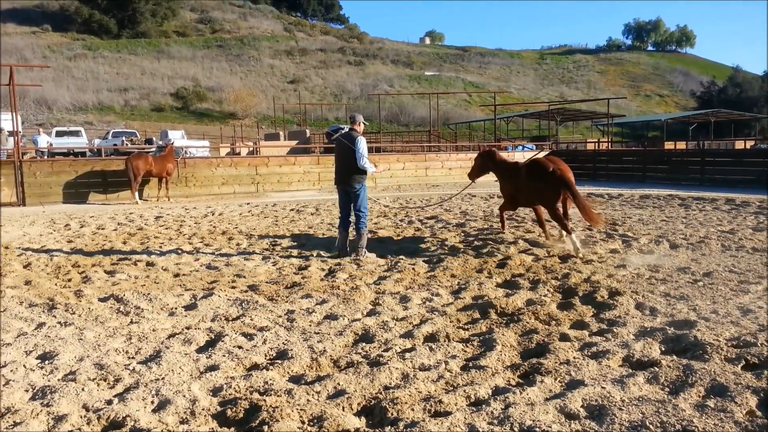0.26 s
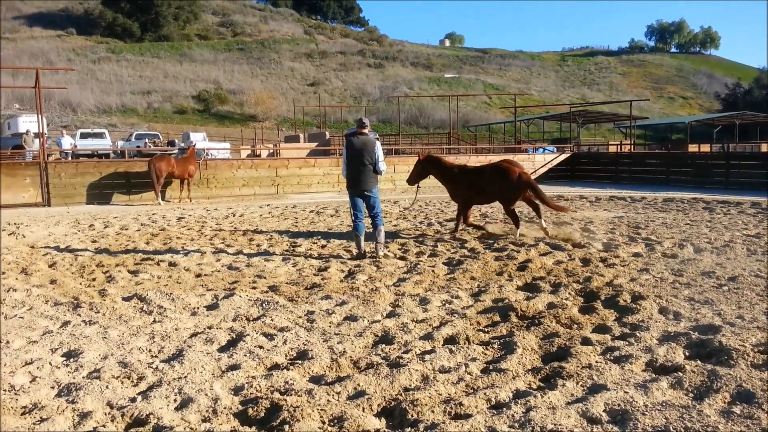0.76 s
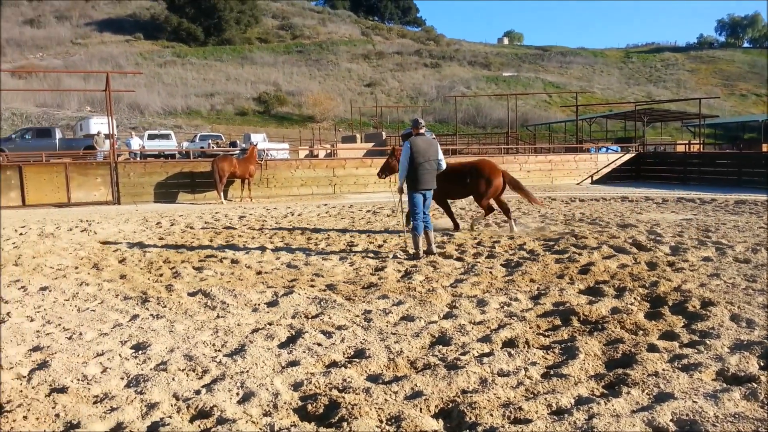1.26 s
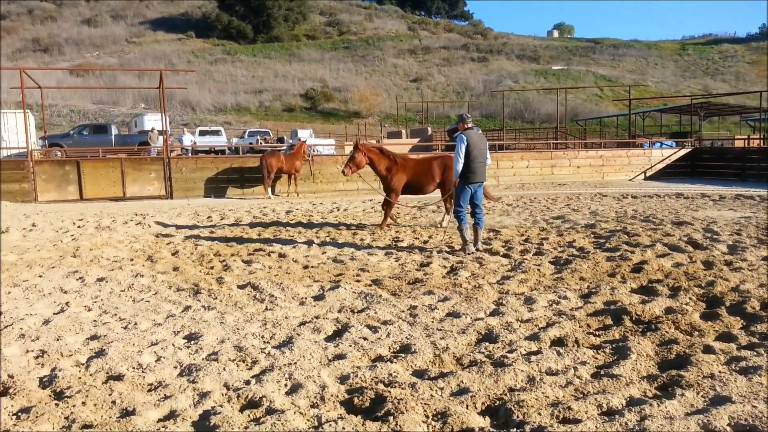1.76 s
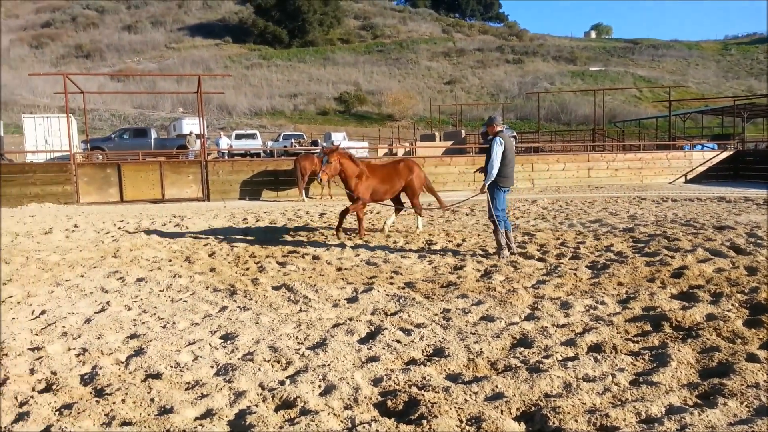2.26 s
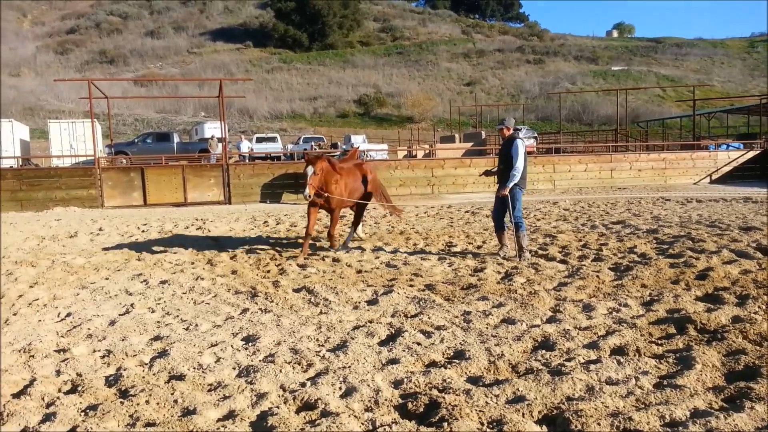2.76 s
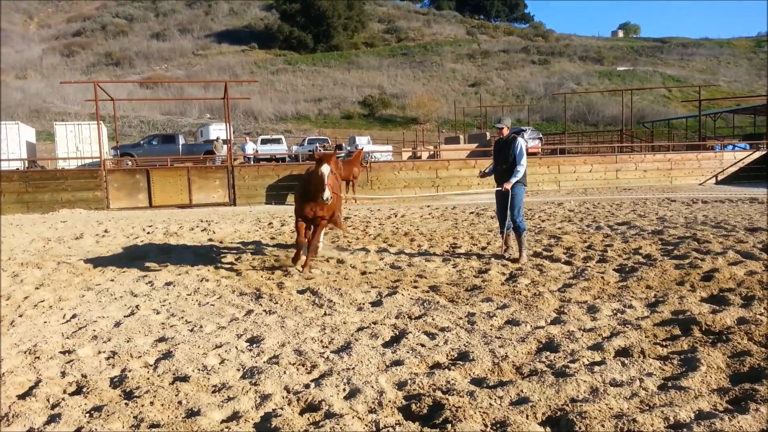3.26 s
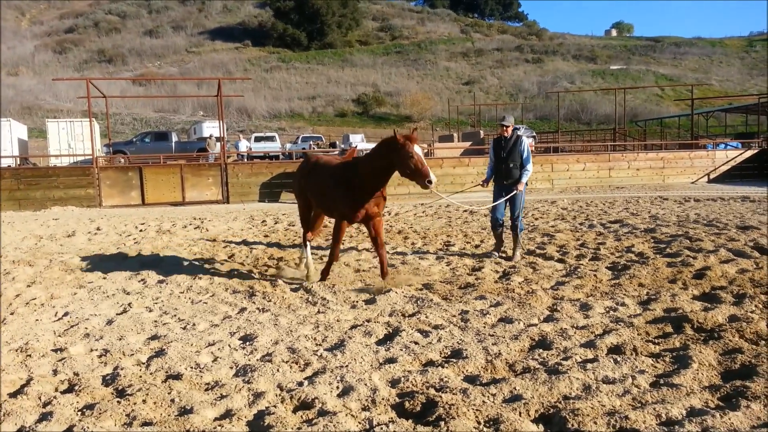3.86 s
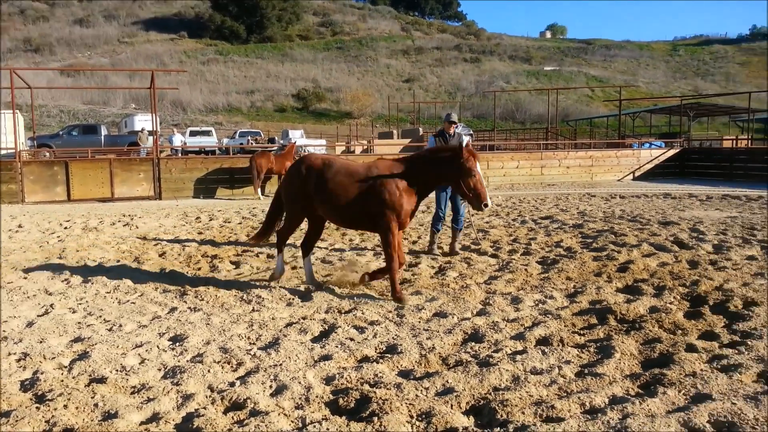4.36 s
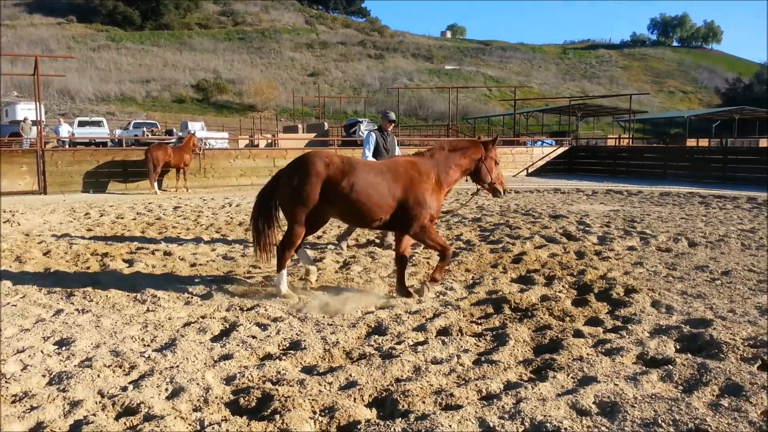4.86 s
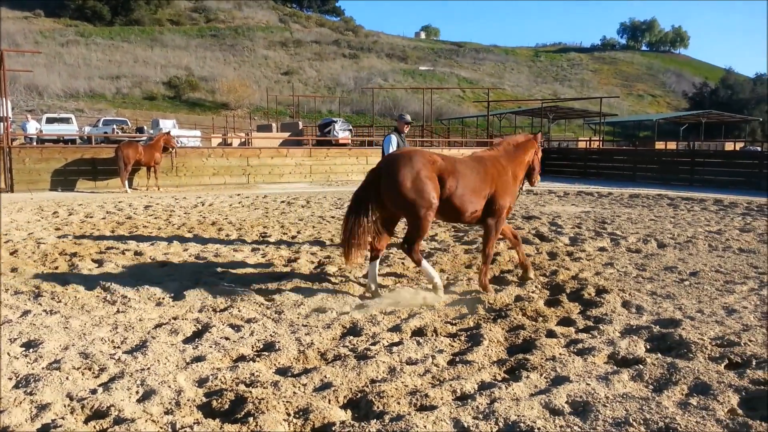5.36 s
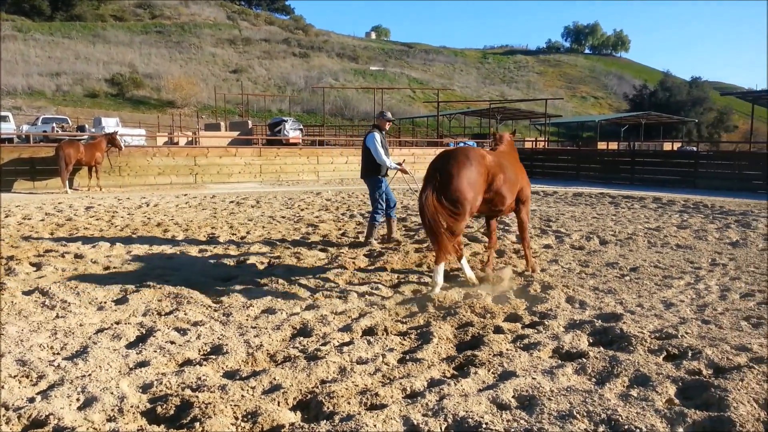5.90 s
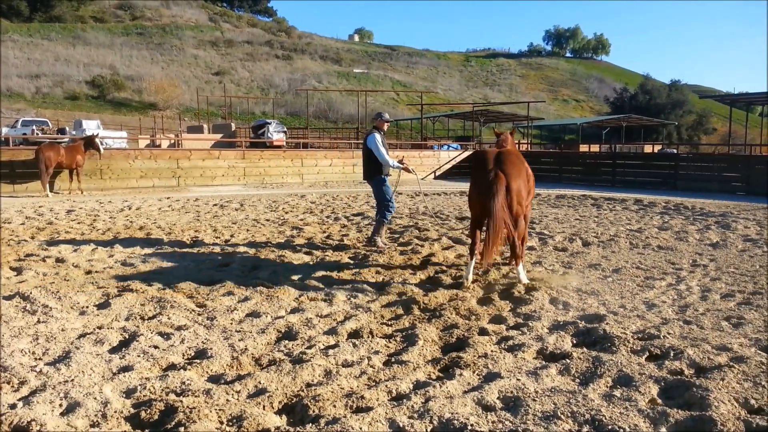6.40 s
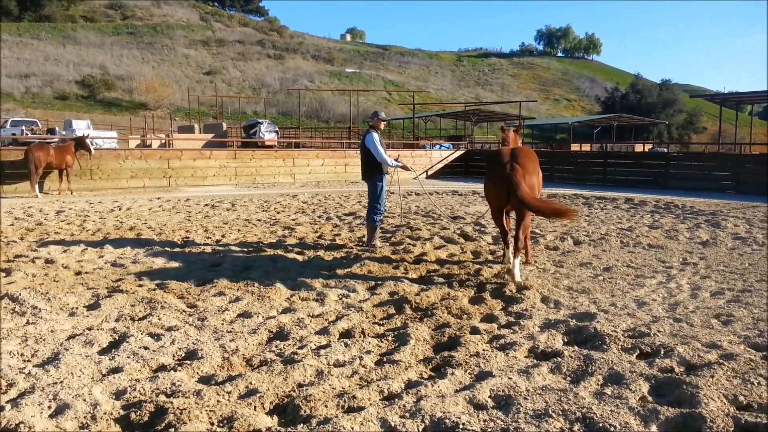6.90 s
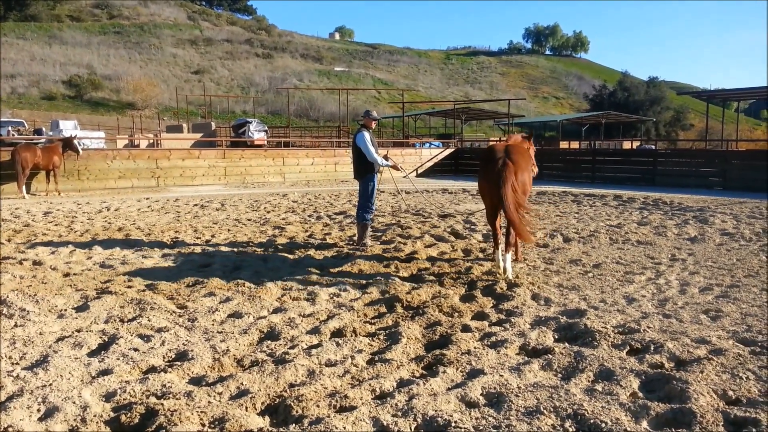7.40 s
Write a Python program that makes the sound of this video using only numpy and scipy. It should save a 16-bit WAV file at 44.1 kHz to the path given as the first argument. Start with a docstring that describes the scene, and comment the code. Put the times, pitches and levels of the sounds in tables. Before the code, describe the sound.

Low gusts rumble and pop, mostly on the right, over a horse's regular breathy snorts, sandy footfalls and light clinking of a lead-line snap.

```python
"""A horse is in mid-blow as a gritty swish and a metal clink sound, on a breezy day in a sandy arena.
It circles on a lead line at a steady canter or trot, blowing filtered noise in time with its stride.
Grainy noise and low thuds make gritty swishes, some of them hoof falls and some nostril hiss;
dying modes clink for the snap of the line. Gusts of shaped noise rumble and pressure bumps pop on the
microphone, mostly on the right port; a bird trills falling notes far off, over a faint high whine."""
import sys
import numpy as np
from scipy import signal
from scipy.fft import rfft, irfft
from scipy.io import wavfile
from scipy.ndimage import uniform_filter1d

SR = 44100
rng = np.random.default_rng(int(sys.argv[2]) if len(sys.argv) > 2 else 0)


def inscribe(sig):
    """Save sig as 16-bit PCM at rate SR to the path in sys.argv[1].

    A 1-D sig is mono; a 2-D sig holds one channel per row.
    Samples are clipped to [-1, 1] before scaling.
    """
    pcm = np.round(np.clip(np.atleast_2d(sig).T, -1, 1) * 32767)
    wavfile.write(sys.argv[1], SR, pcm.astype(np.int16))


N = 336924
TIME = np.arange(N) / SR
BINS = np.fft.rfftfreq(N, 1 / SR)


def amp(db):
    """Decibels to gain."""
    return 10 ** (np.asarray(db) / 20)


def unit(x):
    """Scales to rms 1."""
    return x / np.sqrt(np.mean(x ** 2) + 1e-20)


def curve(rows):
    """Joins (time, value) points into a control curve at every sample."""
    return np.interp(TIME, *np.transpose(rows))


def colour(x, spectrum):
    """Filters by (frequency, level) points joined on a log-frequency axis."""
    hz, db = np.transpose(spectrum)
    response = amp(np.interp(np.log(BINS + 1), np.log(hz), db))
    return irfft(rfft(x) * response, N)


def noise(spectrum):
    """Coloured noise of rms 1."""
    return unit(colour(rng.standard_normal(N), spectrum))


def wander(rate_hz):
    """Smooth random drift of rms 1, from noise with its fast changes removed."""
    lowpass = np.exp(-(BINS / rate_hz) ** 2)
    return unit(irfft(rfft(rng.standard_normal(N)) * lowpass, N))


def pair(make, shared):
    """Two channels that have a share of their power in common."""
    shared = np.clip(shared, 0, 1)
    common = np.sqrt(shared) * make()
    return common + np.sqrt(1 - shared) * np.array([make(), make()])


def add(mix, s, sound):
    """Mixes a sound in at time s, cutting whatever falls outside the scene."""
    start = round(s * SR)
    sound = sound[max(-start, 0):]
    part = mix[max(start, 0):][:len(sound)]
    part += sound[:len(part)]


def burst(t, rise, decay):
    """An envelope that swells and dies away, peak 1."""
    shape = (1 - np.exp(-(t / rise) ** 2)) * np.exp(-t / decay)
    return shape / shape.max()


# spectrum of the open air: (frequency [Hz], level [dB per Hz])
AIR_SPECTRUM = [(120, 12), (300, -5), (600, -6.5), (1100, -15.5), (2000, -22.5), (3500, -24.5),
                (15000, -23.5)]


def open_air(db=-50.5):
    """Steady coloured noise, a quarter of its power common to both ports."""
    return amp(db) * pair(lambda: noise(AIR_SPECTRUM), 0.25)


def whine(db=-77, hz=10380, blur_hz=110):
    """A faint, unsteady high tone that comes and goes."""
    return amp(db) * wander(1.0) * wander(blur_hz) * np.sin(2 * np.pi * hz * TIME)


# start of each phrase of the far bird: time [s]
BIRD_PHRASES = [.06, .44, .95, 1.25, 2.42, 5.11, 5.43, 5.77, 6.06, 6.35, 6.68, 7.27]


def bird(db=-71.5, hz=4850, length=0.114, notes_per_s=70, sweep_hz=340, rise_hz=130, blur_hz=170):
    """A thin trill of quick falling notes that swells towards its end, blurred by distance."""
    t, out = np.arange(round(length * SR)) / SR, np.zeros(N)
    progress = t / length
    for s in BIRD_PHRASES:
        note = (notes_per_s * t + rng.random()) % 1  # position within the note, 0 to 1
        pitch = hz + rise_hz * progress - sweep_hz * (note - .5)
        swell = np.sqrt(np.sin(np.pi * progress ** 2)) * np.sin(np.pi * note)
        trill = swell * np.sin(2 * np.pi * np.cumsum(pitch) / SR)
        add(out, s, amp(db) * unit(trill))
    return out * wander(blur_hz)


# spectrum of the sand: (frequency [Hz], level [dB per Hz])
SAND_SPECTRUM = [(150, -1), (500, 9.5), (2000, 3), (3200, -2.5), (5500, 4), (8000, -0.5), (11000, 1),
                 (15000, -8)]


def grains(per_s=5000, spread_db=6.5, dust=1.0):
    """Sand grains of many sizes tick over a fine hiss; rms 1."""
    hits = rng.random(N) < per_s / SR
    sizes = amp(spread_db * np.minimum(rng.exponential(1, N), 5)) * hits
    ticks = unit(sizes * rng.choice([-1, 1], N))
    return unit(colour(ticks + dust * rng.standard_normal(N), SAND_SPECTRUM))


def eddy(hz, vent_hz=72, build=0.58, collapse=1.53, sharpness=1.182):
    """A pressure bump that builds, then collapses; the microphone's bass cut makes it swing. Peak 1."""
    t = np.arange(-SR // 50, SR // 50) / SR + 0.0012  # the bump comes just ahead of the middle
    turn = 2 * np.pi * hz * sharpness * t
    bump = np.exp(-np.logaddexp(-build * turn, collapse * turn))
    bass_cut = signal.butter(N=3, Wn=vent_hz, btype="high", fs=SR, output="sos")
    swing = signal.sosfilt(bass_cut, bump)
    return swing / abs(swing).max()


def swirls(force, per_s=110, spread_db=2, slow_hz=115, fast_hz=340, roll=1):
    """Small eddies cross at random and roll on for a few turns; stronger wind brings more, faster ones."""
    out = np.zeros(N)
    for speed in np.linspace(0, 1, num=10):
        hz = slow_hz + speed * (fast_hz - slow_hz)
        favoured = np.exp(-((speed - .7 * force) / .4) ** 2)  # wind force selects the eddy speed
        rate = per_s * (.35 + force) * favoured / 2
        sizes = amp(spread_db * rng.exponential(1, N)) * (rng.random(N) < rate / SR)
        pop = eddy(hz)
        rolling = signal.lfilter(*signal.iirpeak(hz, 2, fs=SR), pop)
        out += signal.oaconvolve(sizes, pop + roll * rolling, "same")
    return out


# gusts on the microphone: (start [s], length [s], level before shaping [dB], port that is hit)
GUST_HITS = [(0.058, 0.11, -23, "right"), (0.193, 0.071, -16.5, "right"), (0.555, 0.16, -16, "right"),
             (0.732, 0.052, -21, "right"), (1, 0.073, -17, "right"), (1.111, 0.19, -17.5, "right"),
             (1.339, 0.067, -17.5, "right"), (1.423, 0.14, -22.5, "right"), (3.37, 0.058, -26.5, "right"),
             (3.626, 0.04, -12.5, "right"), (3.679, 0.279, -17.5, "right"), (3.97, .062, -14, "right"),
             (3.776, 0.037, -17, "left"), (4.092, 0.068, -25.5, "right"), (4.397, 0.037, -24.5, "right"),
             (4.581, 0.093, -24.5, "right"), (4.847, 0.12, -19, "right"), (4.953, 0.36, -26, "left"),
             (4.992, 0.075, -19.5, "right"), (5.225, 0.046, -13.5, "right"), (5.291, 0.29, -22, "right"),
             (5.55, 0.035, -23.5, "left"), (5.61, 0.11, -26, "right"), (5.866, 0.061, -26.5, "right"),
             (6.065, 0.13, -27, "right"), (6.173, 0.19, -22.5, "right"), (6.375, 0.35, -23.5, "right"),
             (6.928, 0.045, -19, "right"), (7.474, 0.089, -24, "right")]


def gusting(port, attack_s=0.016, release_s=0.0123, climb_db=1):
    """Strength of the gusts on one port: quick attack, slightly climbing hold, release."""
    t, strength = np.arange(SR) / SR, np.zeros(N)
    for s, length, db, side in GUST_HITS:
        if side == port:
            hold = amp(db + climb_db * (np.minimum(t / length, 1) - 1.5))
            attack = np.minimum(t / attack_s, 1)
            release = np.exp(-np.maximum(t - length, 0) / release_s)
            add(strength, s, attack * hold * release)
    return strength


def steady(x):
    """Evens the slow level to rms 1 and leaves the fast lumps."""
    power = uniform_filter1d(uniform_filter1d(x ** 2, size=2400), size=1200)
    return x / np.sqrt(power + 1e-6)


# course of the breeze on each port: (time [s], level before lulls and trim [dB])
LEFT_BREEZE = [(0, -40.5), (.55, -40), (1.1, -25), (1.9, -50.5), (2.45, -22.5), (2.65, -36), (4.3, -36.5),
               (5.45, -43.5), (6.8, -41), (7.2, -60), (7.64, -38.5)]
RIGHT_BREEZE = [(0, -33.5), (.43, -43), (.85, -34), (1.6, -29.5), (1.95, -44.5), (2.15, -36), (3.3, -39),
                (3.52, -24), (3.58, -45.5), (3.7, -30.5), (6.98, -35.5), (7.12, -44), (7.35, -42),
                (7.5, -38)]
# rumble of a light breeze and of a full gust: (frequency [Hz], level [dB per Hz])
BREEZE_SPECTRUM = [(20, -58), (32, -37), (50, 2), (90, 4), (140, 0), (220, -10), (350, -25), (600, -46.5),
                   (3000, -56)]
GUST_SPECTRUM = [(25, -55), (50, -11), (90, 4), (160, 7), (260, -1), (400, -14), (650, -33.5), (1200, -58),
                 (3000, -54.5)]


def wind(breeze, port, trim_db, swirl_db, hiss_db, calm_db, span_db,
         lumpy_db=3, bass_cut_hz=45, lull_db=3.5, lull_hz=9):
    """Turbulence on one port: a breeze rumbles and lulls; gusts reach higher, swirl and hiss faintly."""
    gusts = gusting(port)
    breeze_gain = amp(curve(breeze) + lull_db * wander(lull_hz))
    level_db = 20 * np.log10(np.hypot(breeze_gain, gusts))
    force = np.clip((level_db - calm_db) / span_db, 0, 1)  # 0 calm, 1 full gust
    lumps = amp(lumpy_db * wander(32.3))
    flow = np.sqrt(1 - force ** 2) * noise(BREEZE_SPECTRUM) + force * lumps * noise(GUST_SPECTRUM)
    flow += amp(swirl_db) * (0.25 + force) * lumps * unit(swirls(force))
    bass_cut = signal.butter(2, bass_cut_hz, "high", fs=SR, output="sos")
    rumble = amp(level_db + trim_db) * steady(signal.sosfilt(bass_cut, flow))
    return rumble + amp(hiss_db) * gusts * grains()


# the largest eddies: (time [s], relative level [dB], base pitch before sharpening [Hz], port that is hit)
LARGE_EDDIES = [(.076, -7, 127, "right"), (0.125, -0.5, 150, "right"), (.212, -5.5, 237, "right"),
                (.345, -14, 190, "right"), (0.472, -13.5, 212, "left"), (.602, -4, 146, "right"),
                (.692, -6, 169, "right"), (.777, -8.5, 204, "right"), (1.205, -3, 180, "right"),
                (1.387, -1, 234, "right"), (1.449, -3, 199, "right"), (1.513, -5.5, 178, "right"),
                (1.542, -2.5, 244, "right"), (3.509, -10.5, 141, "right"), (3.635, -2, 208, "right"),
                (3.665, -3, 202, "left"), (3.737, -4, 334, "right"), (3.853, -3.5, 240, "right"),
                (3.887, -5.5, 342, "right"), (3.92, 2, 213, "right"), (4.115, -0.5, 160, "right"),
                (4.207, -6, 152, "right"), (4.31, -2, 219, "right"), (4.667, -8, 190, "right"),
                (4.918, -5.5, 274, "right"), (5.016, -5.5, 194, "right"), (5.085, -5, 189, "right"),
                (5.254, -2, 176, "right"), (5.546, -4.5, 138, "right"), (5.84, -10, 194, "right"),
                (6.195, -1, 224, "right"), (6.242, -4, 201, "right"), (6.255, -3.5, 203, "right"),
                (6.331, -6, 171, "right"), (6.366, -3, 143, "right"), (6.556, -4.5, 195, "right"),
                (6.717, -.5, 196, "right"), (6.762, -11.5, 176, "right"), (6.95, -7.5, 228, "right"),
                (6.972, -12, 172, "right"), (7.297, -16.5, 119, "left"), (7.386, -13, 148, "right")]


def eddies(flow, port, gain_db=-2.5, sweep=0.85, sweep_s=0.0065, wake=0.21, wake_s=0.00692):
    """Large eddies sweep finer turbulence aside and pop; smaller ones of chance size run ahead and behind."""
    pressure, room = np.zeros(N), np.ones(N)
    dip = min(sweep, 1) * np.hanning(round(2 * sweep_s * SR))
    for s, db, hz, side in LARGE_EDDIES:
        if side == port:
            for place, share in [(-0.011, 1), (-1, wake), (0.96, wake)]:  # main, ahead, behind
                lag, size, speed = 1 + place * rng.uniform(-0.51, 0.512, 3)
                pop = eddy(hz * np.sqrt(speed))
                start = s + place * lag * wake_s - len(pop) / SR / 2
                add(pressure, start, amp(db + gain_db) * share * size * pop)
            add(room, s - sweep_s, -dip)
    return room * flow + pressure


# stones clicking under a hoof: (time [s], peak level [dB], pitch [Hz])
PEBBLE_CLICKS = [(0.037, -30.5, 3900), (0.7438, -45, 5230), (1.235, -39.5, 2420), (3.991, -37.5, 3600),
                 (4.336, -36, 4240)]


def pebbles(decay=0.0011, width=0.27):
    """A dry click of stone on hoof: a band of noise that is over in a few cycles."""
    t, out = np.arange(SR // 50) / SR, np.zeros(N)
    for s, db, hz in PEBBLE_CLICKS:
        band = signal.butter(2, [hz * (1 - width), hz * (1 + width)], "band", fs=SR, output="sos")
        click = signal.sosfilt(band, rng.standard_normal(len(t)) * np.exp(-t / decay))
        add(out, s, amp(db) * click / abs(click).max())
    return out


def ring(modes, t, detune):
    """Dying modes; every knock lands on another spot and weights them differently."""
    hz, db, t60 = np.transpose(modes)[:, :, None]
    size, shift, phase = rng.standard_normal((3, len(modes), 1))
    fade = amp(db + 2 * size - 60 * t / t60)
    tones = np.sin(2 * np.pi * (hz * (1 + detune * shift) * t + phase))
    return (fade * tones).sum(0)


# the snap knocks on the halter ring: (time [s], relative level [dB], high ring relative to that [dB])
SNAP_KNOCKS = [(0.0277, -33.5, -8), (0.076, -36, -2), (.2099, -36, -3.5), (0.8757, -34.5, -3),
               (1.0616, -40, -30), (1.0782, -35.5, -30), (1.213, -35.5, -30), (1.6943, -29.5, -15),
               (1.8582, -30, -4.5), (1.8793, -31.5, -13), (2.612, -28, -22), (2.7435, -33.5, -23),
               (3.2886, -35, -23), (3.97, -36, -37), (4.101, -31.5, -7), (4.1808, -34, -22),
               (4.4273, -31, -30), (4.5017, -26.5, -34), (4.8336, -38, 1.5), (5.007, -32.5, -8),
               (5.038, -34.5, -7), (5.403, -30.5, -15), (5.424, -36, -7), (5.574, -34, 6.5),
               (5.6195, -23.5, -12), (5.8321, -37, -6), (5.9266, -31.5, -26), (5.938, -33, -4),
               (5.985, -34, -4), (6.1404, -52, 11.5), (6.454, -27.5, -5), (6.577, -40, -1)]
# modes of the metal body, and of the thin high ring: (base pitch [Hz], relative level [dB], t60 [s])
BODY_MODES = [(5310, -10.5, 0.07), (5950, 4, 0.015), (6440, -6.5, 0.076), (10060, -6.5, 0.042),
              (11040, -2.5, 0.016)]
HIGH_RING_MODES = [(12400, -4.5, 0.098), (12530, -4, 0.13)]


def snap(knock_db=-8, tick_db=-11.5, tick_decay=0.0047, pitch_spread=0.0155,
         ring_left_db=-7, ring_right_db=0):
    """Metal on metal: a sharp tick, short modes pitched by the spot struck, and a thin high ring."""
    t, out = np.arange(SR // 4) / SR, np.zeros((2, N))
    treble = signal.butter(2, 3500, "high", fs=SR, output="sos")
    for s, db, high_db in SNAP_KNOCKS:
        pitch = np.exp(pitch_spread * rng.standard_normal())
        # the small part radiates differently towards each port
        for port, ring_db in zip(out, [ring_left_db, ring_right_db]):
            body = amp(knock_db) * ring(BODY_MODES, pitch * t, detune=0.03)
            high = amp(ring_db + high_db) * ring(HIGH_RING_MODES, t, detune=0.0029)
            tick = signal.sosfilt(treble, rng.standard_normal(len(t)) * np.exp(-t / tick_decay))
            add(port, s, amp(db) * signal.sosfilt(treble, body + high + amp(tick_db) * tick))
    return out


# gritty swishes, some of them hoof falls and some nostril hiss: (time [s], swish level [dB], decay [s])
GRITTY_SWISHES = [(0.026, -52.5, 0.091), (.21, -57.5, 0.038), (0.463, -56, 0.1), (1.05, -50.5, 0.014),
                  (1.683, -53.5, 0.013), (2.433, -53, 0.03), (2.733, -51.5, 0.017), (2.893, -47.5, 0.025),
                  (3.284, -48, 0.015), (3.387, -58, 0.14), (3.635, -46, 0.018), (3.967, -47, 0.017),
                  (4.084, -54, 0.029), (4.322, -48, 0.022), (4.489, -55.5, 0.028), (4.681, -55, 0.016),
                  (4.842, -48.5, 0.052), (5.38, -57, 0.18), (5.579, -58.5, 0.041), (6.13, -61, 0.023),
                  (6.531, -57, 0.14), (6.743, -59.5, 0.01), (6.934, -60, 0.035), (7.161, -75, 0.043),
                  (7.285, -68, 0.012)]
# the horse's distance as it circles: (time [s], distance [m])
HORSE_DISTANCE = [(0, 6.4), (1.3, 2.73), (2.1, 6.1), (3.2, 6.1), (4.3, 2.86), (5.4, 6.6), (6.6, 3.1),
                  (7.1, 30)]
# spectrum of the dull thud: (frequency [Hz], level [dB per Hz])
THUD_SPECTRUM = [(20, -30), (50, 15.5), (100, 10), (350, -9), (2000, -34)]


def swishes(thud_db=-10, swish_rise=0.034, thud_rise=0.0013, thud_decay=0.0093, clump_db=2.0, clump_hz=30,
            shuffle_db_at_1_m=-40.5, shuffle_fall=1.654):
    """Bursts of grainy noise, each with a low thud, over loose sand that fades as a power of distance."""
    t, swish, push = np.arange(SR // 2) / SR, np.zeros(N), np.zeros(N)
    for s, db, decay in GRITTY_SWISHES:
        add(swish, s - swish_rise / 2, amp(db) * burst(t, swish_rise, decay))
        # in decibels the thud varies half as much as the swish
        add(push, s, amp(db / 2 + thud_db) * burst(t, thud_rise, thud_decay))
    shuffle = amp(shuffle_db_at_1_m) / curve(HORSE_DISTANCE) ** shuffle_fall
    moving = np.hypot(swish, shuffle)
    clumps = amp(clump_db * wander(clump_hz))  # the grit sounds uneven
    return moving * clumps * pair(grains, 0.096) + push * noise(THUD_SPECTRUM)


# the main resonance of the nose moves from blow to blow: (time [s], pitch [Hz])
NOSE_RESONANCE = [(3.3, 780), (3.7, 1200), (6, 900)]
# broad rush of air in the nose: (frequency [Hz], level [dB per Hz])
NOSE_SPECTRUM = [(300, -21), (560, -17), (780, 1), (1380, -12.5), (2000, -9.5), (2600, -22.5), (3300, -44),
                 (5000, -21), (7000, -41)]


def nose(resonance_db=-8, width_hz=70):
    """Air in the nose: a broad rush and one narrow resonance that moves; rms 1."""
    turn = 2 * np.pi * np.cumsum(curve(NOSE_RESONANCE)) / SR
    resonance = wander(width_hz) * np.cos(turn) + wander(width_hz) * np.sin(turn)
    return unit(noise(NOSE_SPECTRUM) + amp(resonance_db) * resonance)


# the horse's blows, one a stride: (time [s], level [dB], length [s], nostril hiss [dB])
HORSE_BLOWS = [(-.04, -50.5, 0.23, -79), (0.442, -50, 0.16, -90), (0.956, -53, 0.29, -73),
               (1.562, -51.5, 0.29, -78), (2.087, -48, 0.29, -47), (2.622, -49, 0.25, -53.5),
               (3.161, -47.5, 0.22, -44.5), (3.691, -45, 0.26, -42.5), (4.223, -51, 0.26, -51),
               (4.736, -50.5, 0.27, -49), (5.323, -62.5, 0.16, -51), (5.958, -60.5, 0.16, -75)]


def blows(gain_db=0, hiss_db=0, flutter_db=2.0, early=0.49):
    """Once a stride, air blows through the resonances of the nose and hisses at the nostrils."""
    flow, jet = np.zeros(N), np.zeros(N)
    for s, db, length, nostril_db in HORSE_BLOWS:
        swell = np.sin(np.pi * np.linspace(0, 1, round(length * SR)) ** early) ** 2  # peaks early
        add(flow, s, amp(db + gain_db) * swell)
        add(jet, s, amp(nostril_db + hiss_db) * swell ** 2)
    hiss = [(1000, 12.0), (3000, -4.5), (5200, 5.5), (7500, -2)]  # (frequency [Hz], level [dB per Hz])
    air = flow * pair(nose, 0.87) + jet * pair(lambda: noise(hiss), 0.069)
    flutter = amp(flutter_db * (wander(31) + wander(300)) / np.sqrt(2))
    return air * flutter


def scene():
    """The horse in the open air, with the wind on top."""
    left = wind(LEFT_BREEZE, "left", trim_db=-1.0, swirl_db=-4, hiss_db=-35.5, calm_db=-36.5, span_db=27)
    right = wind(RIGHT_BREEZE, "right", trim_db=-0.5, swirl_db=-5.0, hiss_db=-39.5,
                 calm_db=-36.5, span_db=18.5)
    far = bird() + whine() + open_air()
    windy = np.array([eddies(left, "left"), eddies(right, "right")])
    horse = pebbles() + snap() + swishes() + blows()
    return horse + windy + far


# colour of the two microphone ports: (frequency [Hz], left level [dB], right level [dB])
PORT_COLOURS = [(318, 2, 3), (776, 1, -1.5), (2100, 4, -1.5), (4470, 1.5, -4.5), (5960, 3.5, -7.5),
                (6740, -2, -3), (9800, -4.5, 1), (11800, -3.5, 0.5), (15100, -2, -1.5)]


def record(dry, edge_hz=14800):
    """Each port colours the sound in its own way and rounds off the highest peaks; then the band limit."""
    ports = np.array(PORT_COLOURS)
    heard = np.array([colour(dry[0], ports[:, :2]), colour(dry[1], ports[:, ::2])])
    rounded = heard / (1 + heard ** 4) ** .25
    lowpass = signal.firwin(201, edge_hz, window=("kaiser", 9), fs=SR)
    return signal.oaconvolve(rounded, lowpass[None], "same")


dry = scene()
out = record(dry)
inscribe(out)
```